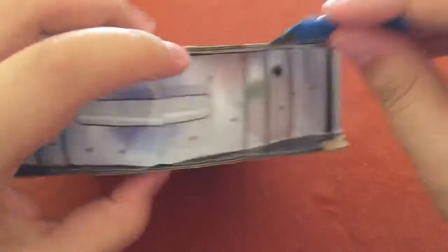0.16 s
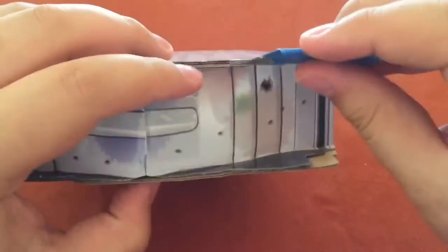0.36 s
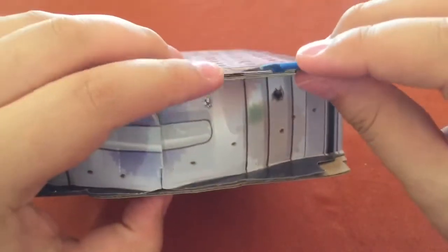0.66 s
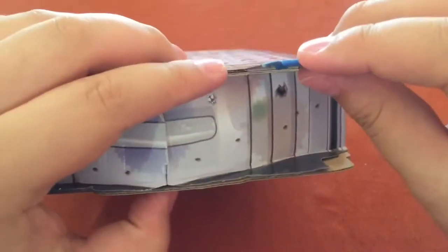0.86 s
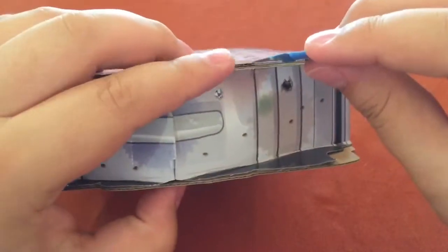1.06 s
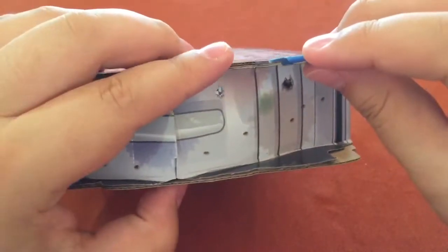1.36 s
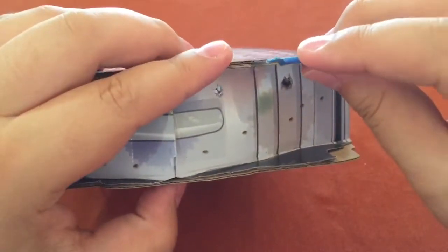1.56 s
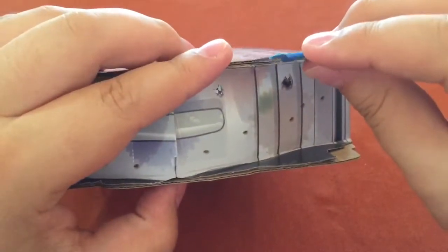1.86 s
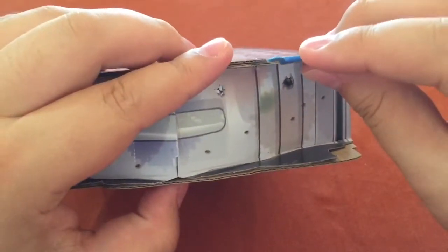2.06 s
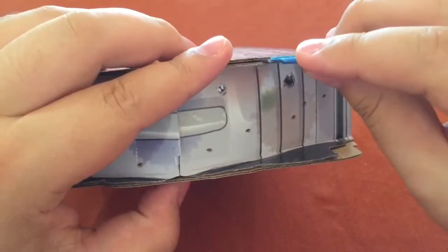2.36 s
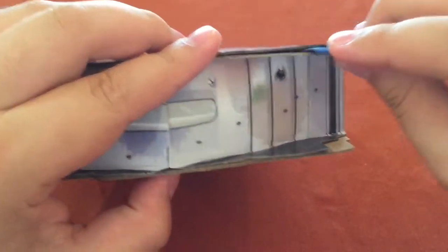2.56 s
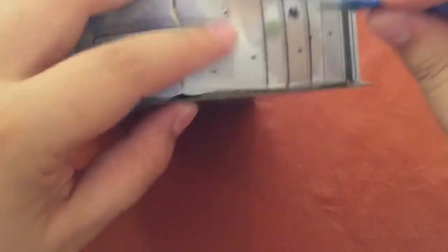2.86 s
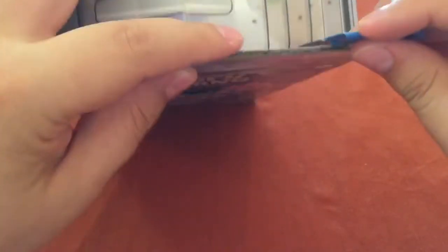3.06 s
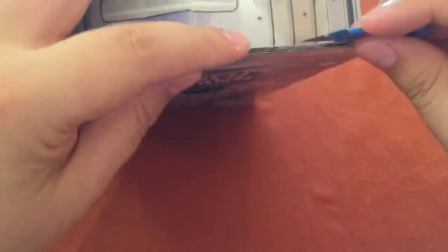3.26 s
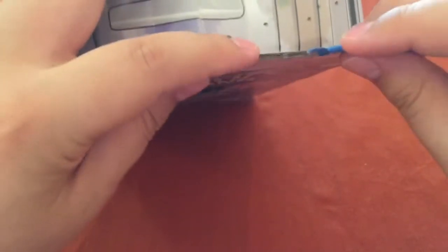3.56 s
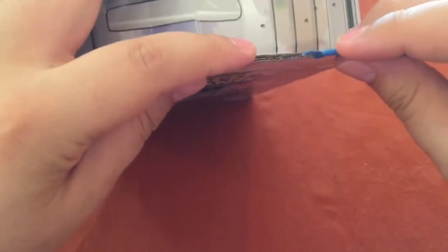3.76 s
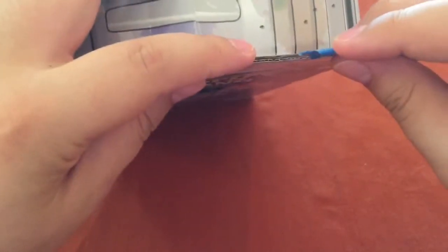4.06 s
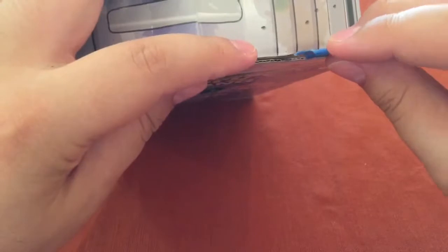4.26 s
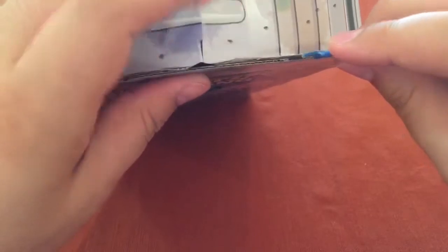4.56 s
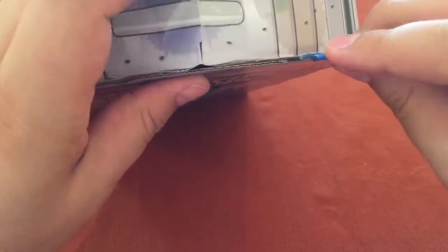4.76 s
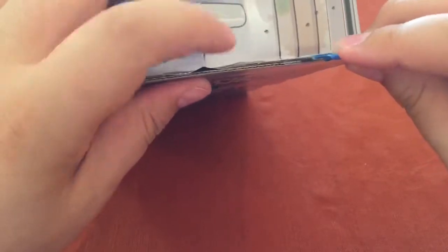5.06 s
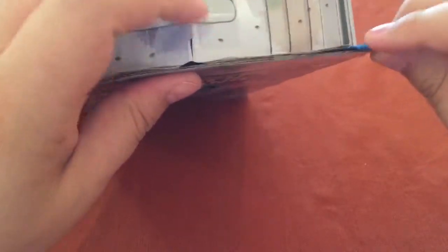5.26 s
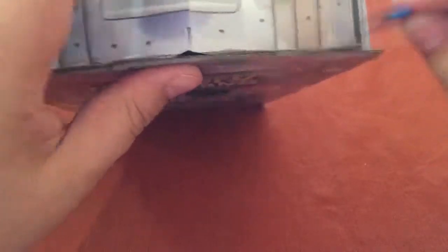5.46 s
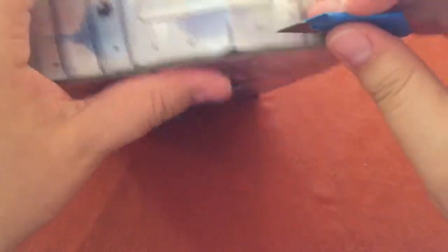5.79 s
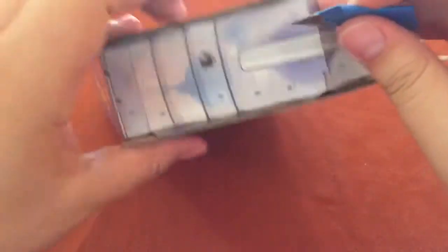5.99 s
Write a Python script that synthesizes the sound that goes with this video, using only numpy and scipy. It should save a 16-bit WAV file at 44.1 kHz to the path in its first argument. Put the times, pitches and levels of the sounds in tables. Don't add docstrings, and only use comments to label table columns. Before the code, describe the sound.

Close to a camera microphone in a quiet room, fingertips tap a light cardboard box and a blade picks at its tape. Sparse ticks lead to a sharp crack and hollow knock, then scraping. After a quieter stretch of small snaps, two stronger tears jolt the box, followed by soft rubbing and taps. A low appliance hum and faint hiss run throughout.

```python
import sys
import numpy as np
from scipy import signal
from scipy.fft import rfft, irfft, next_fast_len
from scipy.io import wavfile
from scipy.ndimage import map_coordinates

SR = 44100
rng = np.random.default_rng(int(sys.argv[2]) if len(sys.argv) > 2 else 0)


def to_wav(s):
    ch = np.atleast_2d(s).T
    pcm = np.round(np.clip(ch, -1, 1) * 32767)
    wavfile.write(sys.argv[1], SR, pcm.astype(np.int16))


def attenuation_scalar(level_db):
    decades = np.asarray(level_db, float) / 20
    return 10 ** decades


N = 270333

# (time [s], peak level [dB], card level [dB], card pitch [Hz])
STRAND_TICKS = [(0.096, -42, -8, 3220), (0.151, -37, -15, 2840), (0.422, -36.5, -11, 3020),
                (0.47, -35, -9, 3260), (0.627, -37.5, -5, 2300), (2.7453, -30.5, -8, 2620),
                (2.8807, -29.5, -13, 4560), (3.066, -39, -0.5, 2730), (3.1943, -36, -7.5, 3700),
                (3.7284, -39.5, -3.5, 2230), (4.1138, -39.5, -5, 4800), (4.3194, -49, -11, 2950),
                (4.561, -36, -6, 2430), (4.8622, -38.5, 0, 2450), (5.017, -30, -26, 2790),
                (5.031, -44, -14, 2950), (5.261, -39, -2, 4560), (5.276, -50, -2, 3180),
                (5.339, -52, 7, 2780), (5.4214, -41, -3, 2670), (5.658, -43, -10, 2300),
                (5.668, -47, -6, 4340)]
# (time [s], peak level [dB], card level [dB], card pitch [Hz], burst [ms])
TAPE_TEARS = [(1.8487, -23.5, -10, 2560, 3.6), (2.2352, -36, -18, 2120, 5.4),
              (2.2394, -35.5, -7, 2250, 5.5), (2.2469, -38, 1, 2490, 6.3), (2.4598, -14, -14, 2390, 3.5),
              (5.0728, -52, 8, 2450, 7.5), (5.0818, -32, -21, 3000, 8.2), (5.086, -18.5, -8, 2780, 6.8),
              (5.1018, -27, -10, 2700, 5.6), (5.4634, -21.5, 2.5, 3570, 2.4), (5.466, -16.5, 2, 3530, 2.9),
              (5.4695, -15, -10, 3180, 4.1), (5.4795, -21.5, -2, 4030, 5.7)]
# (frequency [Hz], level [dB per Hz])
CRACK_COLOUR = [(3000, -68), (5000, 0.5), (8000, 1), (12000, 2), (15500, 4)]
# (time [s], peak level [dB], centre [Hz], build-up [ms], 60 dB decay [ms])
BOX_BLOWS = [(2.4613, -16.5, 440, 2.6, 7.4), (2.462, -28, 814, 1.5, 30), (5.0835, -19, 576, 3.2, 14.6),
             (5.0895, -20.5, 830, 3.2, 17), (5.4658, -16.5, 875, 1.3, 61), (5.4698, -7.5, 760, 2.4, 9),
             (5.471, -10.5, 510, 0.61, 23), (5.47, -23, 343, 2.5, 26), (5.4668, -22.5, 3510, 0.79, 11),
             (5.0875, -29, 2760, 0.58, 6.4), (5.482, -33, 4000, .8, 9)]
# (time [s], peak level [dB], centre [Hz])
FINGER_TAPS = [(0.081, -41.5, 477), (0.109, -32.5, 368), (0.214, -43.5, 640), (0.42, -42.5, 870),
               (0.623, -33.5, 500), (1.85, -32, 470), (1.851, -38, 760), (2.236, -43, 692),
               (2.667, -49, 450), (2.747, -35, 494), (3.065, -46, 447), (3.727, -42, 425), (4.32, -53, 394),
               (4.416, -42.5, 530), (4.564, -36, 650), (4.707, -41, 418), (4.863, -34, 800),
               (4.862, -44.5, 1530), (5.037, -50, 744), (5.342, -42, 820), (5.419, -34.5, 810),
               (5.661, -29, 446), (5.679, -44, 444), (5.786, -37.5, 460), (5.853, -38, 509),
               (5.9, -34, 420), (5.983, -32.5, 490), (6.03, -29, 418)]
# (time [s], peak level [dB], centre [Hz])
NAIL_FLICKS = [(.113, -41, 716), (2.671, -46, 1200), (3.728, -47, 950), (4.321, -45, 800),
               (4.418, -44.5, 920), (4.566, -36, 1230), (4.708, -46, 900), (5.345, -46, 1230),
               (2.461, -30, 1520), (1.85, -41.5, 1410), (2.24, -46, 1150)]
# (time [s], peak level [dB], pitch [Hz], 60 dB decay [ms])
SQUEAKS = [
    (3.02, -48, 2500, 35),
    (5.782, -47, 2500, 35),
    (5.96, -44, 5800, 35),
    (5.388, -41, 1720, 40),
    (.096, -46, 1600, 25),
]
# (pitch [Hz], width [Hz], level [dB])
BOX_PANELS = [(290, 126, -5), (426, 64, 4), (505, 86, 1), (693, 59, 2), (851, 122, -2), (1230, 120, 7.5),
              (1490, 190, -1), (2300, 92, 2), (3165, 670, 7)]
# (full from [s], hold [ms], rise [ms], fall [ms], level [dB])
SKIN_RUBS = [(.12, 35, 35, 27, -58.5), (.47, 3, 3, 19, -67), (2.24, 12, 6.7, 25, -53),
             (2.47, 3, 2.5, 50, -50), (2.5, 76, 11, 24, -55), (2.7, 55, 30, 11, -51.5),
             (2.79, 21, 9, 30, -61), (2.9, 3, 3, 15, -62), (3.04, 18, 40, 30, -61.5), (3.19, 3, 5, 25, -62),
             (4.32, 19, 15, 21, -63), (4.56, 21, 6, 21, -54), (5.03, 61, 12, 11, -57.5),
             (5.11, 3, 5.4, 17, -45.5), (5.13, 3, 5, 91, -50.5), (5.26, 9.2, 5, 11, -62),
             (5.4, 66, 25, 5, -53.5), (5.49, 3, 3, 63, -47), (5.665, 5, 22, 40, -50.5),
             (5.83, 100, 25, 30, -58.5), (5.955, 15, 50, 67, -53), (6.1, 40, 33, 30, -63)]
# (full from [s], hold [ms], rise [ms], fall [ms], level [dB])
CARD_SCRAPES = [(.09, 24, 42, 86, -50.5), (.64, 2.6, 14, 8.6, -49), (2.24, 17, 6.8, 21, -51.5),
                (2.48, 100, 3, 36, -48), (2.67, 92, 27, 21, -45.5), (2.8, 50, 11, 49, -55),
                (3.07, 11, 18, 22, -51.5), (3.17, 11, 15, 23, -57), (4.325, 9.3, 6.9, 15, -55.5),
                (4.56, 12, 8.1, 28, -47.5), (4.87, 2.6, 4.2, 13, -47), (5.03, 105, 15, 5.8, -47.5),
                (5.11, 3, 3.7, 90, -44.5), (5.345, 150, 7.2, 5, -51), (5.49, 3, 3, 78, -37.5),
                (5.65, 24, 3.4, 41, -43.5), (5.85, 135, 52, 33, -48), (6.07, 60, 19, 51, -51.5)]
# (full from [s], hold [ms], rise [ms], fall [ms], level [dB])
GLUE_GRATES = [
    (2.71, 45, 25, 12, -57),
    (3.015, 15, 8, 12, -62),
    (5.11, 110, 8, 15, -58),
    (5.38, 55, 30, 11, -58),
    (5.49, 80, 3, 21, -58),
]
# (frequency [Hz], level [dB per Hz])
SKIN_COLOUR = [(2060, -34), (3500, -12), (3970, -3), (5710, 0.5), (7750, -1), (14700, 4), (16000, -5)]
# (pitch [Hz], width [Hz], level [dB])
RASP_TONES = [(2300, 500, 4.5), (2670, 480, 7), (3290, 620, 3.5), (4870, 990, -3.5)]
# (full from [s], hold [ms], rise [ms], fall [ms], level [dB])
FLAP_CREAKS = [
    (.085, 16, 9.8, 36, -61),
    (2.675, 85, 11, 15, -52),
    (5.035, 11, 6, 15, -56),
    (5.15, 60, 11, 30, -59),
    (5.348, 75, 6, 21, -52),
]
# (full from [s], hold [ms], rise [ms], fall [ms], level [dB])
BLADE_WEDGES = [
    (.09, 11, 8, 40, -60),
    (2.72, 40, 30, 21, -58),
    (5.365, 65, 15, 15, -51),
]
# (frequency [Hz], 60 dB decay [s])
ROOM_DECAY = [(250, 0.18), (1000, 0.15), (4000, 0.5), (15000, 0.24)]
# (delay [s], level [dB])
BOUNCES = [
    (.0065, -16),
    (.0154, -10),
]
# (pitch [Hz], level [dB rms], unsteady share [0-1], drift [per s])
HUM_LINES = [(35.6, -53.5, 0.9, 14), (48.5, -53.5, 0.9, 14), (58.8, -44.5, 0.15, 6.7), (93.7, -60, 1, 18),
             (114, -62.5, 1, 12), (140.5, -53, 0.35, 10), (156, -58, 0.32, 10), (177, -52.5, 0.19, 10),
             (204.6, -56.5, 0.49, 10), (236, -59.5, 0.58, 14), (339, -69, 0.6, 14), (600, -71, 0.6, 12),
             (647, -69, 0.4, 13), (829, -66.5, 0.18, 12), (1165, -79, 0.4, 11), (10300, -86, 0.4, 10)]
# (frequency [Hz], level [dB per Hz])
AIR_COLOUR = [(12, -40), (25, -10), (65, -5.5), (82, -24), (110, -10), (230, -17), (262, -18.5), (480, -23),
              (700, -27), (800, -29.5), (1260, -36), (4000, -41), (16000, -43)]


def unit(x):
    return x / np.sqrt(np.mean(x ** 2) + 1e-20)


def along(points, hz):
    f, value = np.transpose(points)
    return np.interp(np.log(hz + 1), np.log(f + 1), value)


def colour(points):
    return lambda hz: attenuation_scalar(along(points, hz))


def modes(table):
    def response(f):
        total = 0
        for k, (centre, width, db) in enumerate(table):
            peak = 1j * f * width / (centre * centre - f * f + 1j * f * width)
            total = total + (-1) ** k * attenuation_scalar(db) * peak
        return total
    return response


def filtered(x, response):
    size = next_fast_len(N + SR // 2)
    return irfft(rfft(x, size) * response(np.fft.rfftfreq(size, 1 / SR)), size)[:N]


def wobble(rate):
    coarse = np.arange(0, N + 16, 16)
    knots = rng.standard_normal(int(N * rate / SR) + 4)
    return np.interp(np.arange(N), coarse, map_coordinates(knots, [coarse * rate / SR]))


def grainy(response, grain_db):
    grains = rng.standard_normal(N) * attenuation_scalar(grain_db * wobble(400))
    return unit(filtered(grains, response))


def add(track, s, x):
    start = round(s * SR)
    track[start:][:len(x)] += x[:N - start]


def strokes(rows):
    ms = np.arange(0, N / SR * 1000 + 1)
    s, hold, rise, fall, db = np.transpose(rows)[..., None]
    since = ms - 1000 * s
    swell = np.minimum(since, 0) / rise
    fade = np.maximum(since - hold, 0) / fall
    gain = attenuation_scalar(db) * np.exp(swell - fade)
    return np.interp(np.arange(N) / SR * 1000, ms, np.sqrt(np.sum(gain ** 2, 0)))


def snaps():
    first_break, first_break_db = 4, 0.5
    tick_ms = 5
    hiss_level, card_sound, cracks = np.zeros(N), np.zeros(N), np.zeros(N)
    t = np.arange(SR // 25) / SR
    rows = TAPE_TEARS + [(*tick, tick_ms) for tick in STRAND_TICKS]
    for s, db, card_db, card_hz, ms in rows:
        u = t * 4000 / ms
        burst = u * np.exp(1 - u)
        peak = np.argmax(burst)
        push = rng.standard_normal(len(t)) * burst
        push[peak] += first_break
        strip = signal.iirpeak(card_hz, 1.1, SR)
        card = signal.lfilter(*strip, signal.lfilter(*strip, push))
        cracks[round(s * SR) + peak] += attenuation_scalar(db + first_break_db)
        add(hiss_level, s + 0.00029, attenuation_scalar(db - 9.0) * burst)
        add(card_sound, s - 0.0001, attenuation_scalar(db + card_db) * card / np.max(np.abs(card)))
    hiss = hiss_level * grainy(colour(CRACK_COLOUR), grain_db=-2.5)
    return hiss + card_sound + filtered(cracks, colour(CRACK_COLOUR))


def knocks():
    tap_rise_ms, tap_t60_ms = 1.44, 27.6
    flick_rise_ms, flick_t60_ms = 0.54, 11.3
    box_low_hz = 234
    out, t = np.zeros(N), np.arange(SR // 8) / SR
    panel_hz, _, panel_db = np.transpose(BOX_PANELS)[..., None]
    panels = np.sin(2 * np.pi * panel_hz * t)
    rows = BOX_BLOWS + [(*tap, tap_rise_ms, tap_t60_ms) for tap in FINGER_TAPS]
    rows += [(*flick, flick_rise_ms, flick_t60_ms) for flick in NAIL_FLICKS]
    for s, db, centre_hz, rise_ms, t60_ms in rows:
        chance = rng.random((len(BOX_PANELS), 1))
        octaves_away = np.abs(np.log2(panel_hz / centre_hz))
        near = attenuation_scalar(panel_db - 7.1 * octaves_away - 16.5 + 4.6 * chance)
        ring = np.sin(2 * np.pi * centre_hz * t) + np.sum(near * panels, 0)
        build_up = (1 - np.exp(-t * 1000 / rise_ms)) ** 2
        knock = ring * build_up * attenuation_scalar(-60000 * t / t60_ms)
        add(out, s - 0.001, attenuation_scalar(db) * knock / np.max(np.abs(knock)))
    for s, db, squeak_hz, t60_ms in SQUEAKS:
        shape = attenuation_scalar(db - 60000 * t / t60_ms) * (1 - np.exp(-t / 0.0015))
        add(out, s, shape * np.sin(2 * np.pi * squeak_hz * t))
    return signal.lfilter(*signal.butter(2, box_low_hz / (SR / 2), "high"), out)


def slides():
    rasp_skin_db, rasp_card_db = -8, -16.5
    rub, scrape = strokes(SKIN_RUBS), strokes(CARD_SCRAPES)
    rasp_power = (attenuation_scalar(rasp_skin_db) * rub) ** 2 + (attenuation_scalar(rasp_card_db) * scrape) ** 2
    rasp_power += strokes(GLUE_GRATES) ** 2
    skin = grainy(colour(SKIN_COLOUR), grain_db=1.5)
    rumble = grainy(modes(BOX_PANELS[:5]), grain_db=4.5)
    rasp = grainy(modes(RASP_TONES), grain_db=-1.5)
    return rub * skin + scrape * rumble + np.sqrt(rasp_power) * rasp


def stick_slip(hz, width_hz):
    slips = rng.standard_normal(N) + 1j * rng.standard_normal(N)
    swing = slips * attenuation_scalar(1.9 * wobble(200))
    for widening in (1, 3):
        swing = signal.lfilter([1], [1, -np.exp(-widening * np.pi * width_hz / SR)], swing)
    return unit(np.real(swing * np.exp(2j * np.pi * np.cumsum(hz) / SR)))


def creaks():
    flap_db, blade_db = -12, -15
    flap_hz, blade_hz, blade_drift_hz = 1252, 1648, 40.1
    scrape = strokes(CARD_SCRAPES)
    flap = np.hypot(attenuation_scalar(flap_db) * scrape, strokes(FLAP_CREAKS))
    blade = np.hypot(attenuation_scalar(blade_db) * scrape, strokes(BLADE_WEDGES))
    flap_sound = flap * stick_slip(np.full(N, flap_hz), width_hz=130)
    blade_sound = blade * stick_slip(blade_hz + blade_drift_hz * wobble(8), width_hz=140)
    return flap_sound + blade_sound


def room(x):
    hz, t, z = signal.stft(rng.standard_normal(SR // 2), SR, nperseg=256)
    fade = attenuation_scalar(-60 * t / along(ROOM_DECAY, hz)[:, None])
    tail = signal.istft(z * fade, SR, nperseg=256)[1]
    answer = attenuation_scalar(-12.5) * np.pad(tail / np.linalg.norm(tail), (400, 0))
    smear = rng.standard_normal(120) * np.exp(-np.arange(120) / 14)
    smear = smear / np.linalg.norm(smear)
    treble = signal.lfilter(*signal.butter(2, 3900 / (SR / 2), "high"), smear)
    for delay, db in BOUNCES:
        answer[round(delay * SR):][:120] += attenuation_scalar(db) * treble
    return signal.fftconvolve(x, answer)[:N]


def background():
    t = np.arange(N) / SR
    out = attenuation_scalar(-49.0) * grainy(colour(AIR_COLOUR), grain_db=0.5)
    for hz, db, share, drift in HUM_LINES:
        drifting = wobble(drift) + 1j * wobble(drift)
        swing = np.sqrt(1 - share) + np.sqrt(share / 2) * drifting
        tone = np.exp(2j * np.pi * (hz * t + rng.random()))
        out += attenuation_scalar(db) * np.sqrt(2) * np.real(swing * tone)
    return out


def scene():
    hits = snaps() + knocks()
    return (hits + room(hits) + slides() + creaks() + background())[None]


def roll_off(x):
    return signal.sosfilt(signal.butter(12, 16520, fs=SR, output="sos"), x)


def record(dry):
    top_hz, end_hz = 15900, 16450
    mix = filtered(dry[0], lambda hz: attenuation_scalar(-np.clip((hz - top_hz) / 8, 0, 36)) * (hz < end_hz))[None]
    return roll_off(mix)


dry = scene()
out = record(dry)
to_wav(out)
```